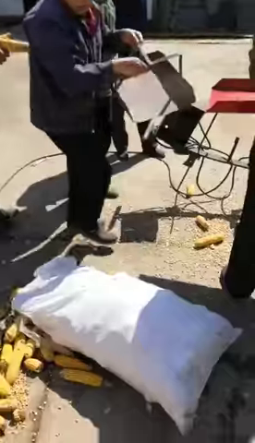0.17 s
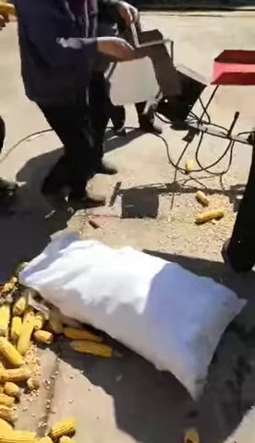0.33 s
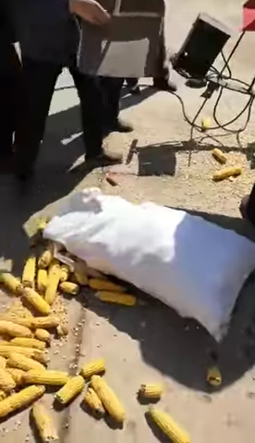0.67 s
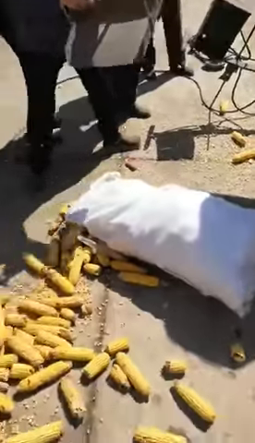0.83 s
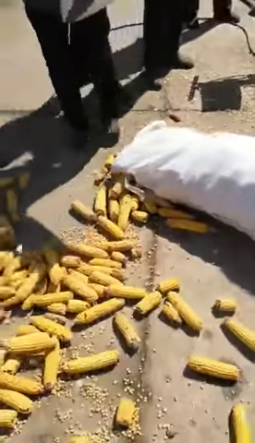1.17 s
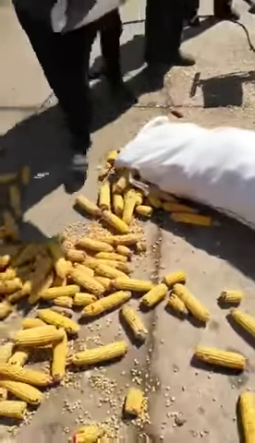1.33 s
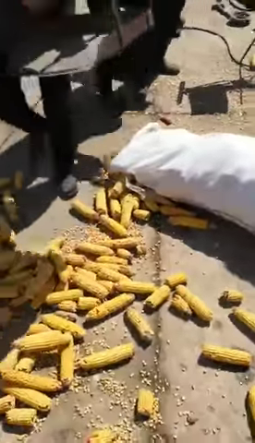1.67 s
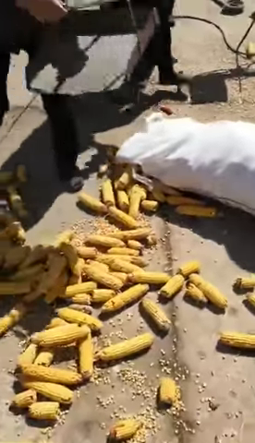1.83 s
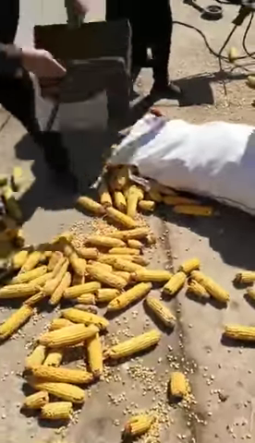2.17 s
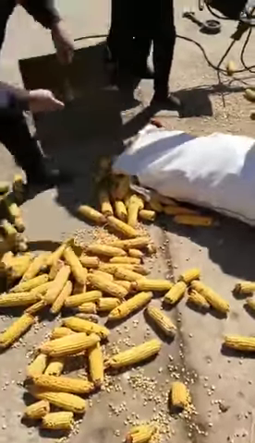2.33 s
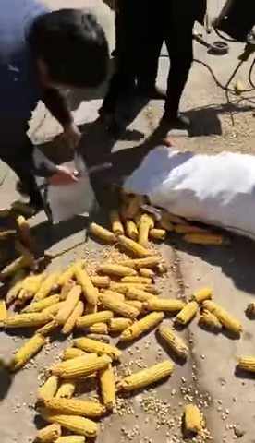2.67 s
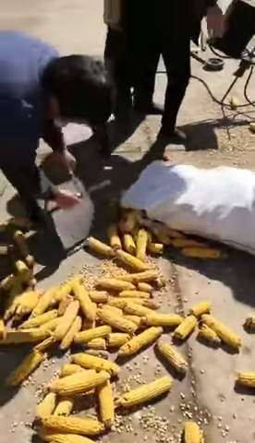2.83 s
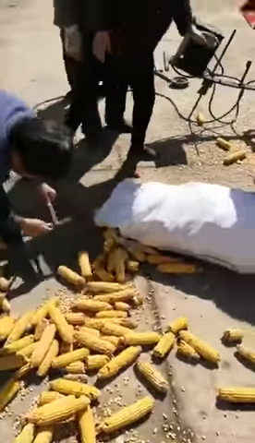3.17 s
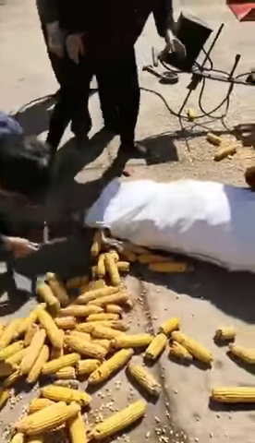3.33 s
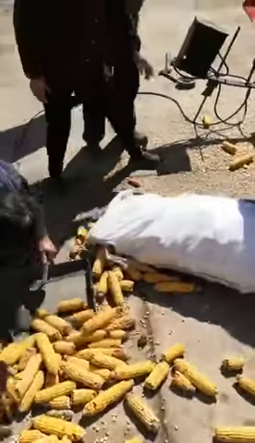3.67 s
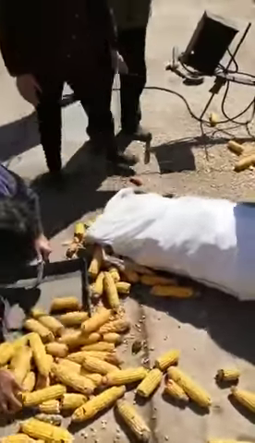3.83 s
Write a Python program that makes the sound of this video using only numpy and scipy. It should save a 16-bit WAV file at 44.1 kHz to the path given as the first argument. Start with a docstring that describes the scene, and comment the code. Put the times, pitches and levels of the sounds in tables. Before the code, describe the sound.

A corn thresher is silent until about 0.34 seconds, then cuts in abruptly at full roar. A low hum and rumbling air underlie dense, irregular clatter of cobs on casing and steel cage. Kernels hiss continuously, surging near 1.65 and 3.65 seconds. Hard blows stand out around 1.0, 2.36, 3.26 and 3.46; a faint low wind puff passes near 1.8. It is still running at 4 seconds.

```python
"""Corn cobs tumble in flurries through a motor-driven thresher, knocking on its casing and ringing its steel cage:
random impacts through damped resonances, plus single hard blows.
Stripped kernels spray out as a dense hiss of coloured clicks. The drum hums at multiples of the shaft rate
over a rumble of churned air (filtered noise); one puff of wind buffets low. Silence first, then an abrupt start."""
import sys
import numpy as np
from scipy import signal
from scipy.fft import rfft, irfft
from scipy.io import wavfile
from scipy.ndimage import uniform_filter1d, map_coordinates

SR = 44100
rng = np.random.default_rng(int(sys.argv[2]) if len(sys.argv) > 2 else 0)


def master(y):
    """Save y as 16-bit WAV."""
    cut = np.clip(np.atleast_2d(y).T, -1, 1)
    pcm = np.round(cut * 32767)  # scale
    wavfile.write(sys.argv[1], SR, pcm.astype(np.int16))


N = 176400


def undb(db):
    """Decibels to gain."""
    return 10 ** (np.asarray(db) / 20)


def unit(x):
    """Scale to rms 1."""
    return x / np.sqrt(np.mean(x ** 2))


def clock():
    """Time of each sample, s."""
    return np.arange(N) / SR


def curve(rows):
    """Gain over time from (t/s, level/dB)."""
    return undb(np.interp(clock(), *np.array(rows).T))


def walk(rate_hz):
    """Random levels held 1 / rate_hz, then smoothed twice; rms 1."""
    hold = max(int(SR / rate_hz), 2)
    steps = rng.standard_normal(1000)[np.arange(N) // hold % 1000]
    return unit(uniform_filter1d(uniform_filter1d(steps, hold), hold))


def bins():
    """Frequency of each spectral line, Hz, floored at 1."""
    return np.maximum(np.arange(N // 2 + 1) * SR / N, 1)


def shape_db(rows):
    """Spectrum in dB from (f/Hz, level/dB), joined on a log-frequency axis."""
    hz, db = np.array(rows).T
    return np.interp(np.log(bins()), np.log(hz), db)


def colour(x, rows):
    """Filter by (f/Hz, level/dB); rms 1."""
    return unit(irfft(rfft(x) * undb(shape_db(rows)), N))


def resonate(x, hz, half_width_hz):
    """One damped resonance, squared for steep skirts: about -6 dB at hz +- half_width_hz."""
    f = bins()
    detuning = (f / hz - hz / f) * hz / (2 * half_width_hz)
    return irfft(rfft(x) / (1 + 1j * detuning) ** 2, N)


def struck(blows, modes):
    """Blows ring a body's resonances, alternating in sign; rms 1."""
    ringing = 0
    for k, (hz, half_width_hz, db) in enumerate(modes):
        ringing = ringing + (-1) ** k * undb(db) * resonate(blows, hz, half_width_hz)
    return unit(ringing)


def impacts(per_s, spread_db, scatter_s, direct):
    """Random clicks of uneven size, shared by both sides, each with a diffuse splash off ground and machine."""
    size = undb(spread_db * np.clip(rng.standard_normal(N), -2, 2))
    clicks = (rng.random(N) < per_s / SR) * size * rng.choice([-1, 1], N)
    energy = signal.lfilter([1], [1, -np.exp(-1 / (scatter_s * SR))], clicks ** 2)
    splash = np.sqrt(energy) * rng.standard_normal((2, N))
    # direct: share of the power
    return np.sqrt(direct) * unit(clicks) + np.sqrt(1 - direct) * unit(splash)


BAND_HZ = 130


def flicker(x, depth_db, rate_hz):
    """Narrow bands swell and fade independently; swells are capped sooner than fades."""
    f, t, spectrum = signal.stft(x, SR, nperseg=1024, noverlap=768)
    grid = np.meshgrid(f / BAND_HZ, t * rate_hz, indexing="ij")
    chance = map_coordinates(rng.standard_normal((200, 600)), grid, order=1, mode="mirror")
    gain = unit(undb(depth_db * chance.clip(-3, 1.2)))
    return signal.istft(spectrum * gain, SR, nperseg=1024, noverlap=768)[1][:, :N]


PUFF_S, PUFF_LENGTH_S, PUFF_HZ, PUFF_DB = 1.835, 0.021, 32.3, -33


def puff():
    """A brief low buffet of wind: resonant noise under a bell-shaped swell."""
    swell = np.exp(-((clock() - PUFF_S) / PUFF_LENGTH_S) ** 2)
    return undb(PUFF_DB) * swell * unit(resonate(rng.standard_normal(N), PUFF_HZ, PUFF_HZ))


# drum hum partials: [multiple of shaft rate, relative level/dB]
HUM_PARTIALS = [(1, -19), (3, 0), (6, -19)]
# hum level: [t/s, level/dB]
HUM_COURSE = [(.34, -22), (.5, -31.5), (.55, -26.5), (1.5, -26.5), (1.59, -41.5), (1.66, -25), (1.9, -39.5),
              (1.97, -32), (2.1, -36.5), (2.55, -29), (2.7, -32.5), (3.4, -27.5), (3.5, -33), (4.0, -30)]
# colour of churned air and motor: [f/Hz, level/dB]
AIR_COLOUR = [(20, -25), (40, -16), (60, -7.5), (85, 0.5), (200, 2.5), (255, 0), (335, 2), (400, -5),
              (470, -18), (700, -21.5), (1500, -39)]
# colour of the rumble spread around the yard: [f/Hz, level/dB]
YARD_COLOUR = [(100, -30), (200, -16), (300, -4), (380, 0), (450, -4), (600, -20), (1500, -50)]
# rumble level: [t/s, level/dB]
RUMBLE_COURSE = [(.34, -22), (.49, -26), (.8, -21), (.9, -25), (1.05, -19.5), (1.23, -24.5), (1.47, -23),
                 (1.86, -23), (2.05, -26), (2.28, -22), (2.41, -23.5), (2.57, -20.5), (2.65, -26),
                 (2.9, -22), (3.15, -22), (3.5, -25), (3.74, -24.5), (4.0, -28)]
HUM_WAVER_DB, HUM_JITTER_TURNS = 3.5, 0.049  # rms
THROB_DB, YARD_DB = 0.75, -12


def drum(turns):
    """Beater bars hum over motor and churned air; the air throbs every second turn, its yard part opposed L/R."""
    shaken = turns + HUM_JITTER_TURNS * walk(20)
    hum = 0
    for multiple, db in HUM_PARTIALS:
        level = undb(db + HUM_WAVER_DB * walk(14))
        hum = hum + level * np.sqrt(2) * np.sin(2 * np.pi * (multiple * shaken + rng.random()))
    air = flicker(colour(rng.standard_normal((1, N)), AIR_COLOUR), depth_db=3.5, rate_hz=30)
    air = air * undb(THROB_DB * np.sin(np.pi * turns))
    wide = undb(YARD_DB) * colour(rng.standard_normal(N), YARD_COLOUR) * np.array([[1], [-1]])
    return hum * curve(HUM_COURSE) + (air + wide) * curve(RUMBLE_COURSE)


# colour of the kernel spray: [f/Hz, level/dB]
SPRAY_COLOUR = [(500, -27), (1200, -3), (1900, -1), (2250, -2), (2600, 7), (3400, 8), (4400, 3),
                (5900, 3.5), (6900, 7), (7500, 3.5)]
# flow of the kernel spray: [t/s, level/dB]
SPRAY_COURSE = [(.35, -11.5), (.5, -19), (.65, -18), (.77, -17), (.88, -18), (1.2, -19), (1.55, -16.5),
                (1.64, -12), (1.8, -13.5), (2.05, -16.5), (2.25, -16.5), (2.56, -17.5), (2.68, -19.5),
                (3.0, -18.5), (3.3, -19), (3.5, -16.5), (3.65, -13.5), (3.85, -16), (4.0, -13.5)]
KERNELS_PER_S, SPURT_DB, SPURT_RATE_HZ = 5000, 0.6, 24.88


def kernels():
    """Thousands of kernels a second tick on the chute and the concrete, in small spurts."""
    ticks = impacts(KERNELS_PER_S, spread_db=2.5, scatter_s=0.0072, direct=0.058)
    hiss = flicker(colour(ticks, SPRAY_COLOUR), depth_db=4.0, rate_hz=22)
    return hiss * curve(SPRAY_COURSE) * undb(SPURT_DB * walk(SPURT_RATE_HZ))


# single hard blows of a cob: [t/s, casing knock level/dB, cage ring level/dB]
HARD_BLOWS = [(.423, -16, -16), (0.569, -15, -24.5), (0.812, -22, -20), (0.961, -22, -11),
              (1.102, -17, -17), (1.128, -26.5, -11.5), (1.85, -37, -13), (1.987, -19.5, -12.5),
              (2.035, -19, -11), (2.364, -15, -7), (2.601, -21, -17.5), (2.677, -19.5, -20.5),
              (2.87, -20, -19), (3.26, -11, -15), (3.343, -22.5, -18), (3.463, -14, -12),
              (3.602, -22, -14.5), (3.813, -20.5, -15.5)]
BLOW_DECAY_S = 0.011  # to 1/e


def hard_blows():
    """A cob flung at casing and cage: sudden dense impacts that die in a few hundredths of a second."""
    t = clock()
    crunch = impacts(5000, spread_db=1.5, scatter_s=.004, direct=0.47)
    knock, ring = struck(crunch, CASING_MODES), struck(crunch, CAGE_MODES)
    total = 0
    for start_s, knock_db, ring_db in HARD_BLOWS:
        decay = (t >= start_s) * np.exp(-np.abs(t - start_s) / BLOW_DECAY_S)
        total = total + decay * (undb(knock_db) * knock + undb(ring_db) * ring)
    return total


# flurries of cobs: [middle t/s, length at half power/s, knock level/dB, ring level/dB]
COB_FLURRIES = [(0.37, 0.11, -23, -17.5), (0.446, 0.023, -19.5, -18.5), (0.484, 0.038, -19, -18),
                (0.555, .05, -22.5, -26), (0.634, 0.056, -20.5, -21), (0.767, 0.073, -21.5, -19),
                (0.822, 0.051, -19.5, -18.5), (0.993, 0.059, -21.5, -16.5), (1.124, 0.073, -25, -15),
                (1.38, 0.036, -25.5, -18), (1.463, 0.045, -24.5, -29.5), (1.528, 0.055, -30.5, -18.5),
                (1.662, 0.082, -24.5, -18.5), (1.749, 0.04, -25.5, -16), (1.939, 0.051, -28.5, -23.5),
                (2.048, .06, -21, -16.5), (2.125, 0.038, -23, -18), (2.207, 0.043, -26, -17),
                (2.273, 0.051, -20.5, -20), (2.402, 0.073, -22.5, -24.5), (2.533, 0.13, -22, -18),
                (2.58, 0.041, -19.5, -18.5), (2.699, 0.031, -17.5, -23), (2.825, 0.025, -20, -23.5),
                (2.899, 0.072, -21, -15.5), (3.108, 0.064, -21.5, -16.5), (3.191, 0.059, -20.5, -19),
                (3.285, .04, -19, -24), (3.346, 0.085, -19, -18.5), (3.514, .03, -21, -24),
                (3.562, 0.043, -17, -18), (3.65, 0.075, -24, -20.5), (3.729, 0.078, -20.5, -22),
                (3.806, 0.025, -19, -19), (3.925, .15, -31.5, -17.5)]


def load(steady_db, column):
    """Battering strength: steady power plus a bell-shaped swell per flurry."""
    t, power = clock(), undb(steady_db) ** 2
    for row in COB_FLURRIES:
        middle_s, length_s = row[:2]
        power = power + undb(row[column]) ** 2 * .5 ** ((2 * (t - middle_s) / length_s) ** 2)
    return np.sqrt(power)


# casing resonances: [f/Hz, half-width/Hz, level/dB]
CASING_MODES = [(582, 136, -5.5), (717, 174, -8), (1097, 322, -1), (1384, 337, -5), (1820, 368, -0.5)]
# steel cage resonances: [f/Hz, half-width/Hz, level/dB]
CAGE_MODES = [(2010, 205, -10), (2434, 134, -3), (2618, 106, -1), (2950, 226, -7)]
KNOCKS_PER_S, RINGS_PER_S = 450, 600
KNOCK_DB, RING_DB = -24, -20.5  # steady battering under the flurries


def cobs(turns):
    """Cobs knock on the casing, a little harder once each turn, and ring the cage."""
    beat = undb(0.3 * np.sin(2 * np.pi * turns))
    knocks = impacts(KNOCKS_PER_S, spread_db=0.5, scatter_s=0.045, direct=0.45) * beat
    rings = impacts(RINGS_PER_S, spread_db=2.0, scatter_s=0.0042, direct=0.54)
    casing = struck(knocks, CASING_MODES) * load(KNOCK_DB, column=2)
    cage = struck(rings, CAGE_MODES) * load(RING_DB, column=3)
    return flicker(casing + cage, depth_db=4, rate_hz=20)


SHAFT_HZ, SHAFT_WANDER = 94.33, 0.0012  # wander: rms fraction


def scene():
    """One shaft drives the hum and the threshing."""
    turns = np.cumsum(SHAFT_HZ * (1 + SHAFT_WANDER * walk(6.0))) / SR
    return puff() + drum(turns) + kernels() + hard_blows() + cobs(turns)


# left minus right level: [f/Hz, level/dB]
SIDE_BALANCE = [(300, 2.5), (420, -3.5), (520, 5.5), (680, 9), (850, 2), (1050, -1), (1350, -2),
                (2250, 1.5), (2600, -4.5), (3100, -5), (3550, 2), (4150, 3.5), (5600, 5.5), (6200, -1),
                (6700, -2.5)]
# lead of left over right: [f/Hz, phase/rad]
SIDE_LEAD = [(280, 0), (420, .3), (530, 2.4), (860, .2), (1250, 1.7), (1600, .3), (1980, 2.6), (2230, 3.1),
             (2600, 2.7), (3190, 4.9), (3880, 5.8)]
START_S, ALIKE_HZ, CEILING, TOP_HZ = .341, 250, .78, 7550


def record(dry):
    """Two ports share the bass, differ in level and phase above; abrupt start, rounded peaks, steep low-pass."""
    apart = np.clip(bins() / ALIKE_HZ - 1, 0, 1)  # full from 2 * ALIKE_HZ
    balance_db = shape_db(SIDE_BALANCE) * apart
    lead_rad = np.interp(bins(), *np.array(SIDE_LEAD).T) * apart
    sides = np.array([[.5], [-.5]])
    heard = irfft(rfft(dry) * undb(sides * balance_db) * np.exp(1j * sides * lead_rad), N)
    heard = heard * (clock() >= START_S)
    heard = heard / (1 + (heard / CEILING) ** 8) ** (1 / 8)
    low_pass = signal.ellip(14, .1, 90, TOP_HZ, fs=SR, output="sos")
    return signal.sosfilt(low_pass, heard)


dry = scene()
out = record(dry)
master(out)
```